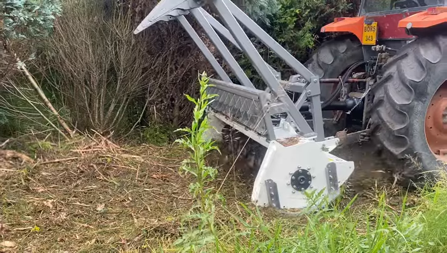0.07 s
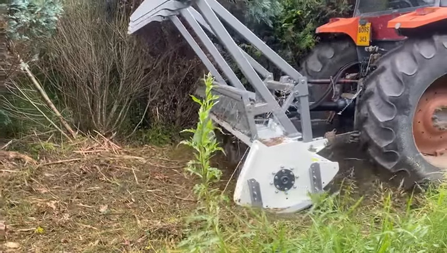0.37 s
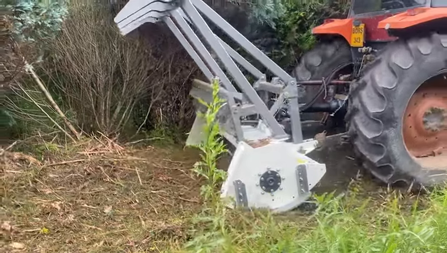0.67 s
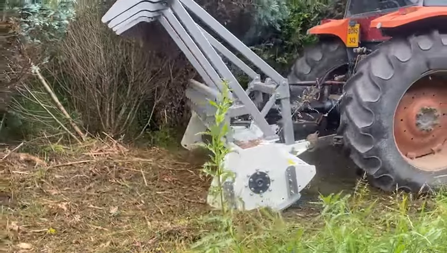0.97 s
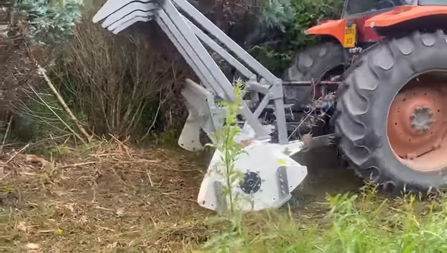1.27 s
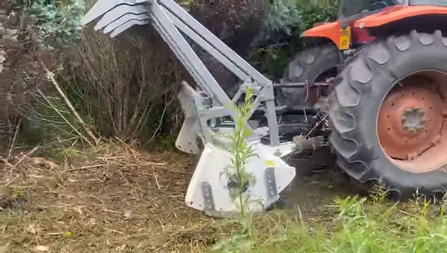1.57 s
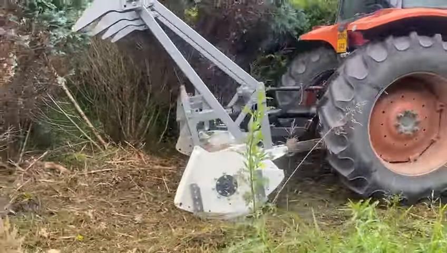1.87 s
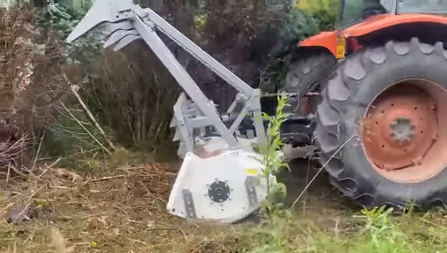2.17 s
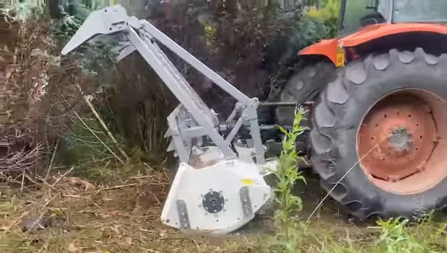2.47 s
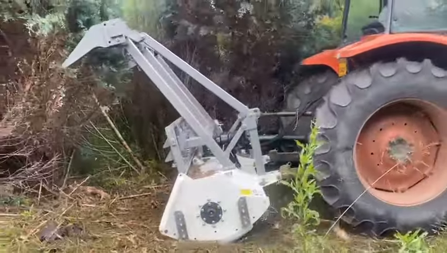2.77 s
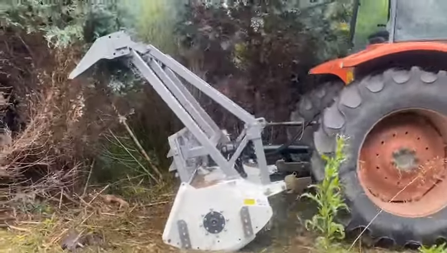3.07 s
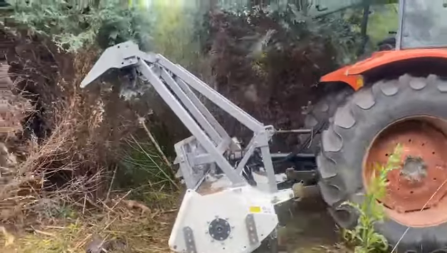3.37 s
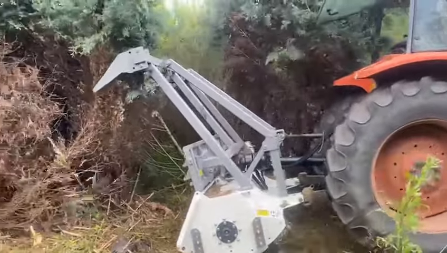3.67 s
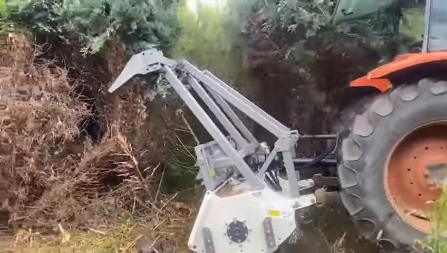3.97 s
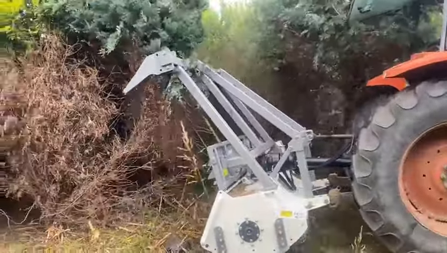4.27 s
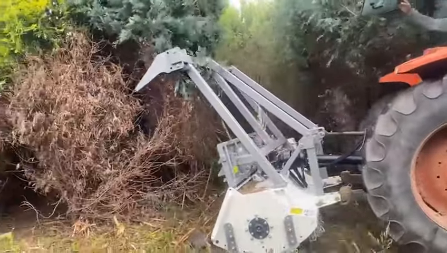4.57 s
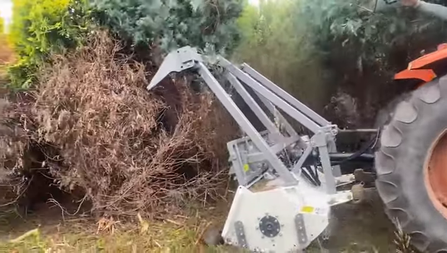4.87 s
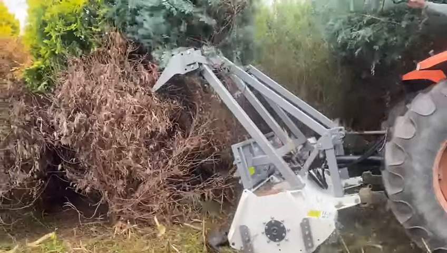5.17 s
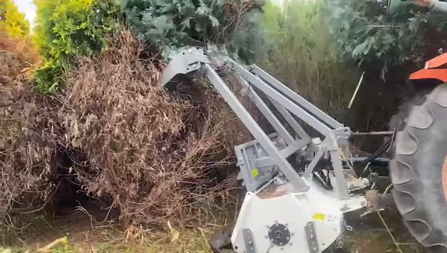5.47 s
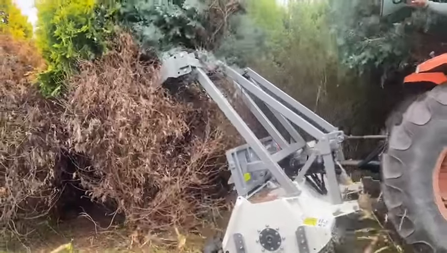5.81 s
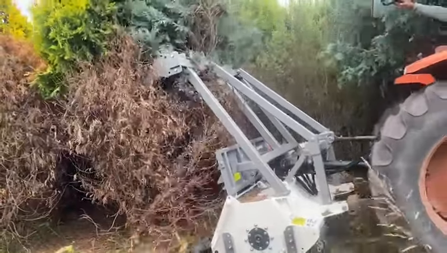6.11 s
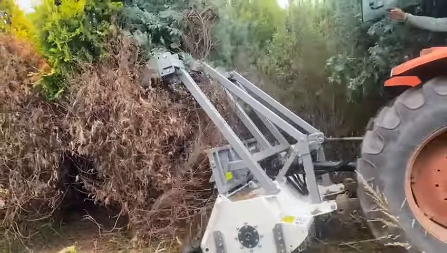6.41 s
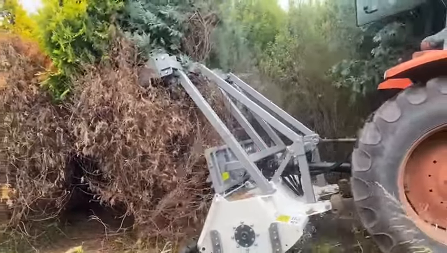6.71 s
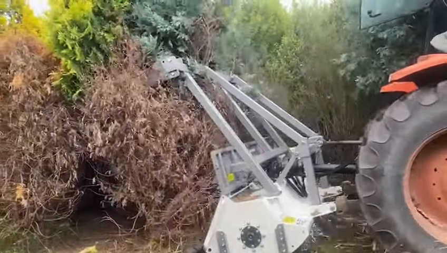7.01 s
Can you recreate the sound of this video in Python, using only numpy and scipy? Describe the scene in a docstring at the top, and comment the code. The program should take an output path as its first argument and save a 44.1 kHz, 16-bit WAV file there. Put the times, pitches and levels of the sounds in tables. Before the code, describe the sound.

A tractor engine drones and clatters outdoors while its mulcher shreds dry brush, branches snapping, then howls louder as thick stems thump its steel hood.

```python
"""Out in the open, a few metres away, a four-cylinder tractor backs a drum mulcher into dry brush.
The exhaust drones, throbbing about twice a second, the engine clatters and the gears whine.
The teeth of the spinning drum (the rotor) shred twigs, and chips drum on the steel hood over it.
Single branches snap. From about four seconds on the rotor bites into the thicket: its gears howl
through the hood, and thick stems slam into the steel."""
import sys
import numpy as np
from scipy import signal
from scipy.fft import rfft, irfft, next_fast_len
from scipy.io import wavfile

SR = 44100
rng = np.random.default_rng(int(sys.argv[2]) if len(sys.argv) > 2 else 0)


def transcribe(u):
    """Save the signal u as a 16-bit wav file named by the first command-line argument.

    u: samples, shape (n,) or (channels, n), limited to [-1, 1]; the rate is SR.
    q: integer samples, one column per channel.
    """
    v = np.clip(np.atleast_2d(u).T, -1, 1)
    q = np.round(v * 32767).astype(np.int16)
    wavfile.write(sys.argv[1], SR, q)


N = 310905
TIME, FREQS = np.arange(N) / SR, np.fft.rfftfreq(next_fast_len(N), 1 / SR)

# how fast the engine's crankshaft spins: (time [s], speed [turns per second])
CRANK_SPEED = [(0.15, 34.28), (0.4, 34.41), (0.7, 34.94), (1.7, 35.07), (2.8, 35.04), (3.9, 34.73),
               (4.9, 34.6), (5.4, 34.52), (5.9, 34.55), (6.4, 34.74), (6.9, 34.57)]
# the exhaust's main note: (time [s], level [dB], depth of the throb [share])
DRONE = [(0.1, -32.5, .15), (1.9, -33.8, .4), (2.5, -34.5, .7), (5.2, -30.3, .75), (7.05, -32, .6)]
# the note an octave above it: (time [s], level [dB])
DRONE_OCTAVE = [(0.15, -38), (0.5, -35), (0.68, -29.5), (0.91, -28), (1.01, -47), (1.12, -27.5),
                (1.5, -32.5), (2.13, -37), (2.25, -27), (2.8, -37), (3.1, -32), (3.8, -35), (4.8, -29),
                (5.6, -37), (6.5, -30.5)]
# the power shaft slips behind the firing, one throb per whole number: (time [s], throbs [count])
SHAFT_SLIP = [(0, -.3), (2.19, 4), (4.23, 8), (4.9, 9), (5.42, 10), (7.06, 13.1)]
# weaker exhaust notes: (pitch [times the crank speed], level against the main note [dB])
CYLINDER_TONES = [(2.5, -7.5), (3, -6.5), (4.5, -16), (5, -14), (6, -13), (7, -15)]
# engine clatter and fan: (frequency [Hz], relative level [dB])
CLATTER_SPECTRUM = [(25, -14), (45, -9), (70, -3), (230, -2), (290, -12), (390, -10.5), (490, -3.5),
                    (600, 0), (690, -3.5), (760, -11), (910, -19), (1700, -18.5), (2700, -16.5),
                    (4800, -24.5), (6000, -30), (7200, -29), (11000, -34)]
# where the engine block rings: (frequency [Hz], width [Hz], boost [dB])
BLOCK_RESONANCES = [(990, 70, 4), (1190, 80, 4), (2150, 45, 9)]
# the whine of the engine's timing gears: (time [s], level [dB])
GEAR_WHINE = [(0.1, -46), (0.27, -40), (0.55, -47), (0.8, -46), (1.05, -54), (1.7, -62), (2.0, -44.5),
              (2.42, -60), (2.62, -46), (2.98, -47), (3.08, -36), (3.2, -38), (3.33, -47), (4.1, -45),
              (4.27, -36), (4.4, -46), (4.7, -37), (5.3, -47), (6.15, -48), (6.33, -39), (6.6, -49)]
# the octave above that whine: (time [s], level [dB])
GEAR_WHINE_OCTAVE = [(0.1, -55), (0.28, -43), (0.45, -50), (1.1, -53), (1.2, -43), (1.36, -44), (1.46, -55),
                     (1.95, -53), (2.08, -42.5), (2.19, -52), (2.9, -54), (3.15, -45), (3.3, -52),
                     (3.46, -38), (3.58, -52), (3.93, -39.5), (4.08, -47), (7.05, -50)]
# parts driven by belts: (frequency at the usual crank speed [Hz], level [dB])
BELT_TONES = [(1728, -56), (2046, -52.5), (3783, -58)]
# how hard the rotor works, as relative levels: (time [s], chips [dB], gear howl [dB], twigs [dB])
ROTOR_LOAD = [(0.12, -37.5, -39, -33.5), (0.45, -39, -39, -38), (0.9, -40, -37, -39), (1.15, -39, -39, -47),
              (2.1, -38.5, -38, -42.5), (2.45, -39, -40, -41), (2.95, -36, -41, -37),
              (3.45, -30.5, -28.5, -33.5), (3.66, -33, -39, -33.5), (3.78, -30, -26, -32.5),
              (3.95, -34.5, -35, -32.3), (4.25, -30, -27, -31.5), (4.55, -25.7, -21.8, -29),
              (5.2, -23.7, -20, -26), (5.7, -25.2, -22, -27.5), (6.0, -27.7, -22.5, -31),
              (6.5, -28.5, -22, -31), (6.63, -29, -29, -30), (6.72, -28, -22.5, -28.5),
              (7.0, -25.5, -24, -27.5)]
# the teeth catch bundles of twigs: (time [s], relative peak level [dB], time to fade by 60 dB [s])
BUNDLES = [(0.1, -31, .35), (0.41, -35, .3), (0.88, -38, .35), (1.048, -32, .17), (2.6, -37, .25),
           (2.745, -34.5, .2), (3.17, -33.5, .6), (3.5, -33, .35), (4.28, -31, .4), (4.33, -28, .35),
           (4.79, -29, .6), (5.24, -28.5, .5), (5.39, -31, .2), (5.79, -28, .4), (6.05, -33, .7),
           (6.45, -32.5, .5), (6.7, -32, .4), (7.02, -30, .4)]
# dry wood splintering: (frequency [Hz], relative level [dB])
WOOD_SPECTRUM = [(150, -3), (500, 9), (1000, 2), (1800, 1), (2600, 2.5), (3300, -2), (4700, 2),
                 (5900, -4.5), (7200, -3), (9000, -5.5), (11500, -12)]
# the steel hood under the chips: (frequency [Hz], relative level [dB])
HOOD_SPECTRUM = [(30, -33), (60, 1.5), (110, 0.5), (200, 1.5), (320, -9.5), (420, -6.5), (500, -1.5),
                 (600, 3.5), (660, 1), (750, -18), (1300, -23), (2500, -18), (5000, -35)]
# where the hood's panels ring: (frequency [Hz], width [Hz], boost [dB])
PANEL_RESONANCES = [(428, 14, 7), (520, 30, 4), (657, 16, 3), (853, 16, 9), (938, 34, 8.5), (1250, 80, 15),
                    (1502, 45, 14)]
# branches breaking: (time [s], relative level [dB], centre frequency [Hz], width [octaves])
SNAPS = [(0.089, -21.5, 4300, .6), (0.279, -27.5, 3900, .7), (0.411, -32, 5000, .6), (0.506, -34, 5300, 1),
         (0.674, -37, 6500, .4), (0.706, -32.5, 1700, 1.8), (0.874, -29, 2850, .3), (1.043, -31, 5500, 1),
         (1.372, -35, 4020, .3), (2.139, -33, 1600, .9), (2.191, -35, 6540, .8), (2.341, -32, 7500, 1.1),
         (2.353, -31, 3700, 1.2), (2.598, -34, 4000, 1), (2.726, -32, 3500, 1), (2.827, -33.5, 5500, 1),
         (2.94, -30, 1510, .05), (3.149, -33, 5200, .7), (3.246, -31.5, 4500, .7), (3.335, -29.5, 1700, 1),
         (3.486, -25, 3300, .9), (3.51, -24.5, 1500, 1.2), (3.923, -29, 4200, .7), (4.022, -27.5, 1600, .7),
         (4.043, -27, 3300, 1.1), (4.339, -27, 4000, 1.2), (4.645, -22.5, 1270, .08),
         (4.853, -23.5, 1900, .9), (5.376, -20.5, 7200, .07), (6.292, -29.5, 4500, .5),
         (6.447, -29, 4500, 1.4), (6.508, -25, 1400, .7)]
# thick stems hitting the hood: (time [s], relative level [dB])
STEM_BLOWS = [(3.779, -24), (4.564, -16), (4.792, -17), (5.066, -11), (5.337, -13), (5.577, -15),
              (5.855, -16), (5.955, -16), (6.915, -15)]
# the notes in the hood's boom: (frequency [Hz], relative level [dB])
BOOM_NOTES = [(72, -6), (205, -9), (522, -7), (575, -2), (618, -2)]
# the microphone's two sides: (frequency [Hz], likeness [0 to 1], left minus right [dB])
STEREO_IMAGE = [(100, 0.93, 0), (300, 0.98, -0.5), (570, 0.86, -0.6), (900, 0.51, -.9), (1470, 0.77, .5),
                (2530, 0.47, 4), (4020, 1, -0.3), (5270, 0.28, 2), (6600, 1, -0.2), (8050, 1, 0)]
# how far the left side's wave runs ahead: (frequency [Hz], phase lead [radians])
LEFT_LEAD = [(300, -.15), (600, -.7), (950, 0), (2000, .4), (3900, 0), (7500, 0), (8500, -np.pi),
             (9600, -np.pi), (10400, -2 * np.pi)]

USUAL_CRANK_HZ, USUAL_LOAD_DB = 35.03, -34
TIMING_TEETH, ROTOR_GEAR_TEETH, CUTTER_ROWS = 36, 18, 6


def amp(db):
    """Turns decibels into a number to multiply by."""
    return 10 ** (np.asarray(db) / 20)


def unit(x):
    """Scales x so that its average strength (rms) is 1."""
    return x / np.sqrt(np.mean(x ** 2) + 1e-20)


def curves(rows):
    """Joins the points of each table column with straight lines over time."""
    times, *columns = np.transpose(rows)
    return [np.interp(TIME, times, column) for column in columns]


def spectra(rows):
    """Joins the points of each table column with straight lines over pitch (log frequency)."""
    hz, *columns = np.transpose(rows)
    return [np.interp(np.log(FREQS + 1), np.log(hz), column) for column in columns]


def filtered(x, gain):
    """Multiplies each frequency in x by its own gain."""
    size = next_fast_len(N)
    return irfft(rfft(x, size) * gain, size)[..., :N]


def colour(x, spectrum, resonances=()):
    """Shapes x with a broad spectrum plus ringing peaks, at strength 1."""
    peaks_db = sum(db / (1 + (2 * (FREQS - hz) / width) ** 2) for hz, width, db in resonances)
    return unit(filtered(x, amp(spectra(spectrum)[0] + peaks_db)))


def wander(rate_hz):
    """A smooth random drift of strength 1."""
    return unit(filtered(rng.standard_normal(N), np.exp(-(FREQS / rate_hz) ** 2)))


def hiss():
    """Two unrelated channels of white noise."""
    return rng.standard_normal((2, N))


def bursts(per_s, spread_db, t60):
    """The loudness of random cracks: each starts at once and fades by 60 dB in t60 seconds."""
    sizes = amp(spread_db * np.minimum(rng.exponential(1, N), 3.5))
    cracks = sizes * (rng.random(N) < per_s / SR)
    power_kept = amp(-120 / (t60 * SR))
    return unit(np.sqrt(signal.lfilter([1], [1, -power_kept], cracks ** 2)))


def tone(turns, multiple, rough, rough_hz, beat=1):
    """A wavering note that vibrates `multiple` times per shaft turn; `beat` can make it throb."""
    shake = (1 + rough * (wander(rough_hz) + 1j * wander(rough_hz))) / np.sqrt(.5 + rough ** 2)
    return (beat * shake * np.exp(2j * np.pi * (multiple * turns + rng.random()))).real


def exhaust(crank):
    """Two firings a turn make a drone that throbs against the power shaft and roughens under load."""
    (drone_db, depth), (octave_db,) = curves(DRONE), curves(DRONE_OCTAVE)
    twigs_db = curves(ROTOR_LOAD)[2]
    strain = amp(.8 * (twigs_db - USUAL_LOAD_DB))
    slip = np.exp(-2j * np.pi * curves(SHAFT_SLIP)[0])
    throb = 1 - depth * slip - .22 / slip ** 2
    drone = amp(drone_db) * tone(crank, 2, rough=.17 * strain, rough_hz=10, beat=throb)
    octave = amp(octave_db) * tone(crank, 4, rough=.25 * strain, rough_hz=8)
    # the cylinders are not quite equal, which adds weaker notes
    uneven = sum(amp(db) * tone(crank, k, rough=.35, rough_hz=3.5) for k, db in CYLINDER_TONES)
    return drone + octave + amp(drone_db) * uneven


def engine_clatter(crank):
    """Each firing rattles the engine block over the steady rush of the fan."""
    knock = 1 + .56 * np.exp(-(2 * crank % 1) / .18)
    return amp(-32) * colour(hiss() * knock, CLATTER_SPECTRUM, BLOCK_RESONANCES)


def engine_whine(crank):
    """The timing gears and belt-driven parts whine at pitches that follow the engine's speed."""
    (gears_db,), (octave_db,) = curves(GEAR_WHINE), curves(GEAR_WHINE_OCTAVE)
    gears = amp(gears_db) * tone(crank, TIMING_TEETH, rough=.4, rough_hz=28)
    octave = amp(octave_db) * tone(crank, 2 * TIMING_TEETH, rough=.5, rough_hz=22)
    belts = sum(amp(db) * tone(crank, hz / USUAL_CRANK_HZ, rough=.45, rough_hz=6)
                for hz, db in BELT_TONES)
    return gears + octave + belts


def rotor_drive(rotor, crank):
    """The rotor hums louder as it works, and its gears howl through the hood."""
    _, howl_db, twigs_db = curves(ROTOR_LOAD)
    # each firing, and each two-turn engine cycle, shakes the gears
    ripple = 1 + .2 * np.cos(2 * np.pi * 2 * crank) + .24 * np.cos(2 * np.pi * crank / 2)
    flutter_db = 1.9 * wander(12)
    howl = amp(howl_db - 1 + flutter_db) * ripple * tone(rotor, ROTOR_GEAR_TEETH, rough=.25, rough_hz=24)
    hum_db = -38.5 + .65 * (twigs_db - USUAL_LOAD_DB)
    return howl + amp(hum_db) * tone(rotor, CUTTER_ROWS, rough=.45, rough_hz=7)


def brush_feed(steady_db):
    """The level in dB of brush going in: a steady stream, plus bundles caught and chewed away."""
    power = amp(steady_db) ** 2
    for start, db, t60 in BUNDLES:
        before, after = np.maximum(start - TIME, 0), np.maximum(TIME - start, 0)
        rise = np.exp(-before / .012)
        power += (rise * amp(db - 60 * after / t60)) ** 2
    return 10 * np.log10(power)


def twig_clumps(x, patchy_db, rate_hz, bands=6):
    """Twigs of each thickness come in their own clumps, so each pitch band swells by itself."""
    place = np.interp(np.log(FREQS + 1), np.log([1000, 11000]), [0, bands - 1])
    parts = (filtered(x, np.maximum(1 - abs(place - k), 0)) for k in range(bands))
    return unit(sum(part * amp(patchy_db * wander(rate_hz)) for part in parts))


def mulching(rotor):
    """Teeth tear twigs, surging slightly once a turn; splinters crackle and chips drum on the hood."""
    chips_db, _, twigs_db = curves(ROTOR_LOAD)
    feed_db = brush_feed(twigs_db)
    bite = 1 + .069 * np.cos(2 * np.pi * rotor)
    twigs = bursts(per_s=200, spread_db=1.9, t60=.17)
    splinters = bursts(per_s=1200, spread_db=2.55, t60=.0037)
    tearing = unit(hiss() * twigs) + .73 * unit(hiss() * splinters * twigs) + .98 * hiss()
    chips = hiss() * bursts(per_s=500, spread_db=2.6, t60=.019) * bite + .5 * unit(tearing)
    clumps = twig_clumps(tearing * bite, patchy_db=1.3, rate_hz=24)
    shredding = amp(feed_db + 1.9) * colour(clumps, WOOD_SPECTRUM)
    drumming = amp(chips_db + 3.4) * colour(chips, HOOD_SPECTRUM, PANEL_RESONANCES)
    return shredding + drumming + tumbling_sticks(feed_db)


def tumbling_sticks(feed_db, lengths=20, hits_per_s=4, ring_cycles=6):
    """Torn sticks tumble in the hood, each length ringing briefly with its own hollow note."""
    t, out = np.arange(SR // 20) / SR, np.zeros((2, N))
    for hz in np.geomspace(950, 2600, lengths):
        fade = np.exp(-hz * t / ring_cycles)
        note = np.sin(2 * np.pi * hz * rng.uniform(.95, 1.04) * t) * fade / np.sqrt(hz)
        hits = (rng.random((2, N)) < hits_per_s / SR) * amp(5 * rng.random((2, N)))
        out += signal.oaconvolve(hits, note[None], axes=1)[:, :N]
    starved_db = np.minimum(feed_db - USUAL_LOAD_DB, 0)  # a thin feed holds few sticks
    return amp(feed_db + starved_db - 6.3) * unit(out)


def branch_snaps():
    """A branch breaks in a quick run of cracking fibres; its thickness colours the sound."""
    out = np.zeros((2, N))
    fibres = unit(hiss() * bursts(per_s=2000, spread_db=2, t60=.006))
    for start, db, centre_hz, octaves in SNAPS:
        t60 = .075 + .08 * np.exp(-abs(octaves) / .2)  # narrow snaps ring longer
        at = round(start * SR)
        run = fibres[:, at:at + SR // 8]
        t = np.arange(run.shape[1]) / SR
        edges_hz = centre_hz * 2 ** (np.array([-1, 1]) * (abs(octaves) / 2 + .02))
        band = signal.butter(1, np.clip(edges_hz, 100, 15000), "bandpass", fs=SR)
        crack = signal.lfilter(*band, run) * amp(-60 * t / t60)
        opening_strength = crack[:, :SR // 100].std(axis=1, keepdims=True)
        out[:, at:at + len(t)] += amp(db - 1) * crack / opening_strength
    return out


def panel_ring(hz=843, db=-35, t60=1.2):
    """The first branch strikes a hood panel, which rings on."""
    after = np.maximum(TIME - SNAPS[0][0], 0)
    return amp(db - 60 * after / t60) * np.sin(2 * np.pi * hz * after)


def stem_blows(rise_s=.003, t60=.16):
    """Thick stems slam into the hood, which booms briefly each time."""
    t, out = np.arange(SR) / SR, np.zeros(N + SR)
    notes = sum(amp(db) * np.sin(2 * np.pi * hz * t) for hz, db in BOOM_NOTES)
    boom = (1 - np.exp(-t / rise_s)) * amp(-60 * t / t60) * notes
    for start, db in STEM_BLOWS:
        out[round(start * SR):][:SR] += amp(db + 1) * boom
    return out[:N]


def microphone(noises, tones):
    """Both sides share the tones and part of the scattered noise, with small shifts in level and time."""
    (likeness, balance_db), (lead,) = spectra(STEREO_IMAGE), spectra(LEFT_LEAD)
    angle = np.arccos(np.clip(likeness, -1, 1)) / 2
    shared = filtered(noises[0], np.cos(angle)) + tones
    apart = filtered(noises[1], np.sin(angle))
    tilt = amp(balance_db / 2)
    left = filtered(shared + apart, tilt)
    right = filtered(shared - apart, np.exp(-1j * lead) / tilt)
    return np.array([left, right])


def scene():
    """One crankshaft drives the engine sounds and, through the power shaft, the rotor."""
    crank = np.cumsum(curves(CRANK_SPEED)[0]) / SR  # turns made so far
    rotor = .9387 * crank
    whine = engine_whine(crank)
    noises = engine_clatter(crank) + mulching(rotor) + branch_snaps()
    tones = exhaust(crank) + whine + rotor_drive(rotor, crank) + panel_ring() + stem_blows()
    return microphone(noises, tones)


def record(dry, start_s=.083, cutoff_hz=11850):
    """The sound sets in just after the start, and the highest treble is cut away."""
    lowpass = signal.firwin(511, cutoff_hz, window=("kaiser", 9), fs=SR)
    return signal.oaconvolve(dry * (TIME > start_s), lowpass[None], "same")


dry = scene()
out = record(dry)
transcribe(out)
```